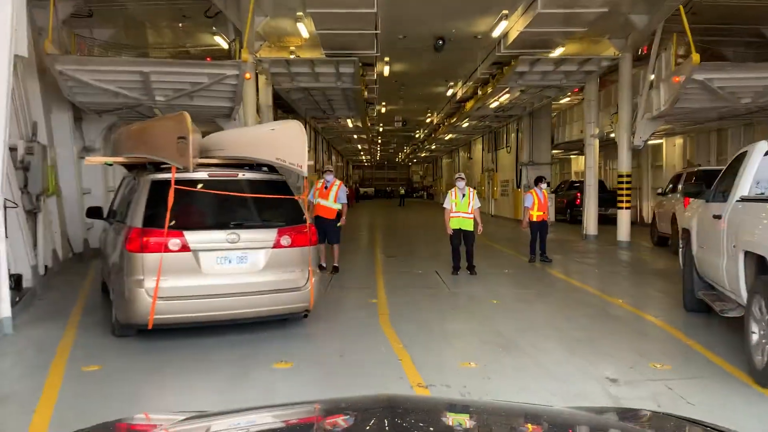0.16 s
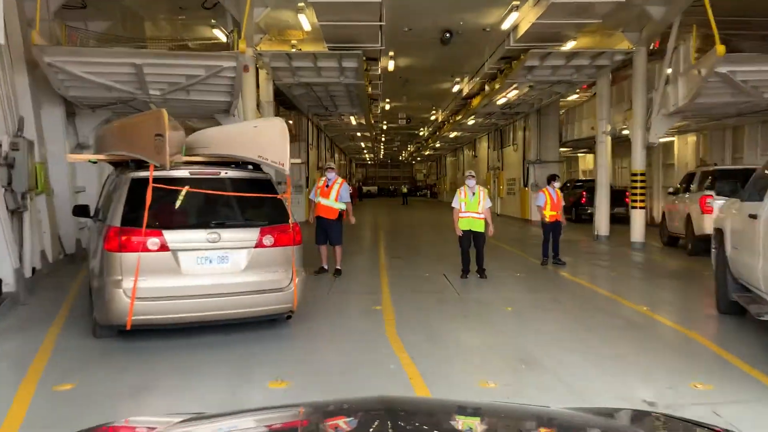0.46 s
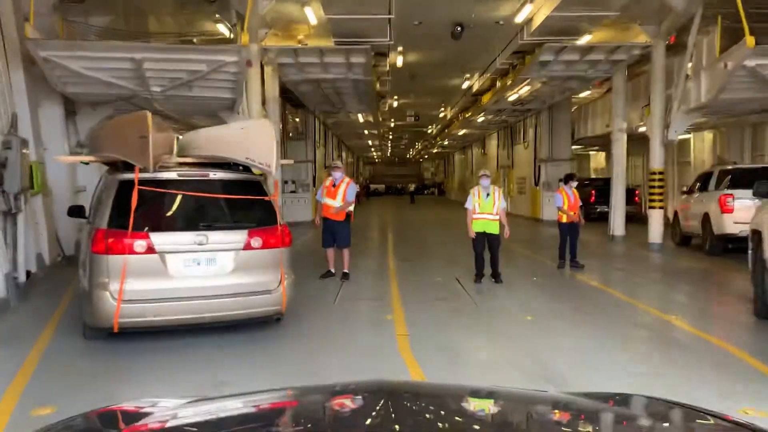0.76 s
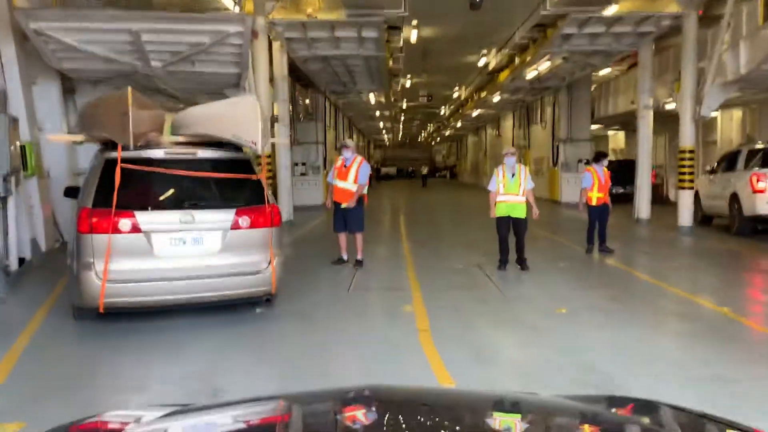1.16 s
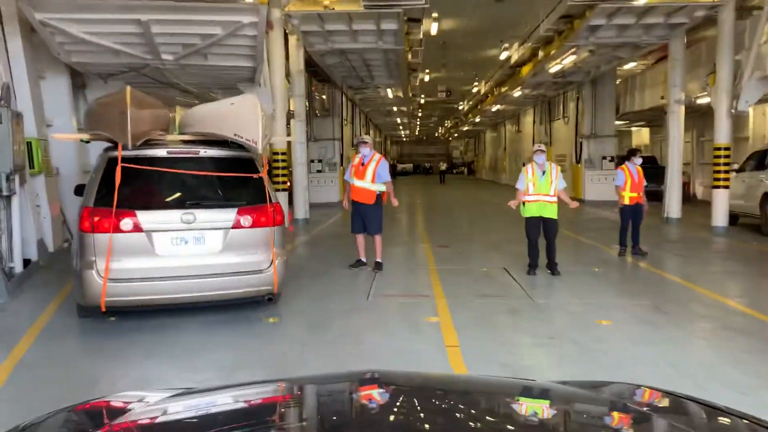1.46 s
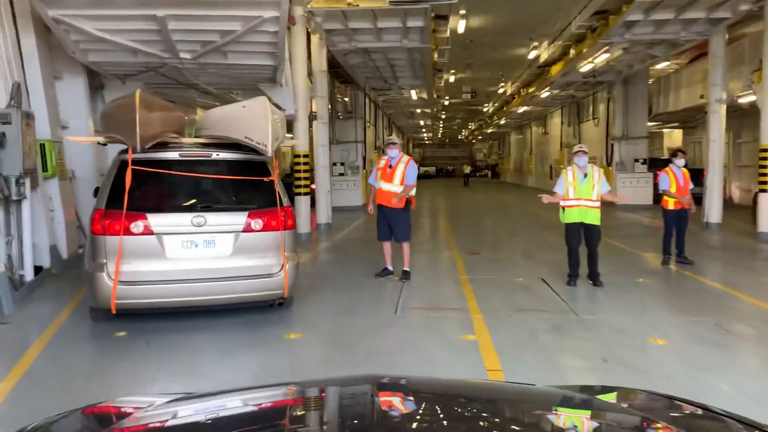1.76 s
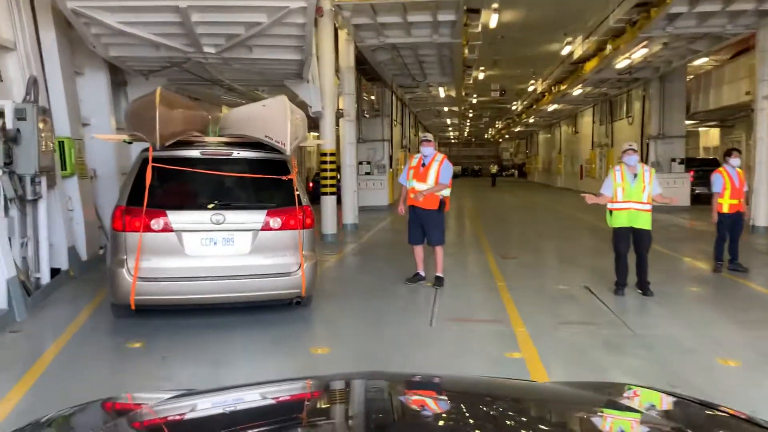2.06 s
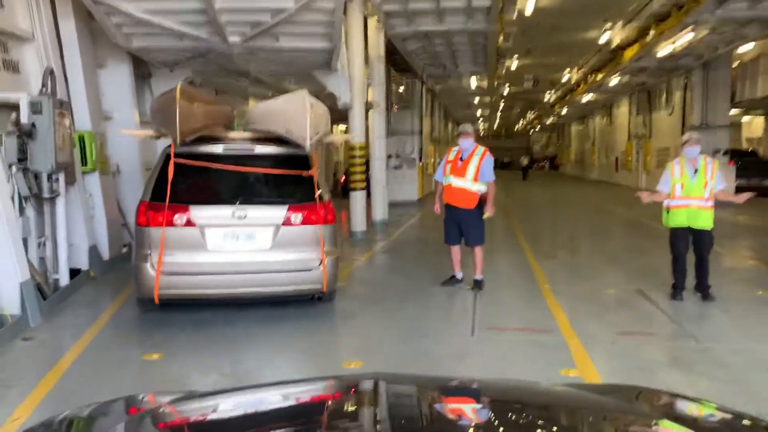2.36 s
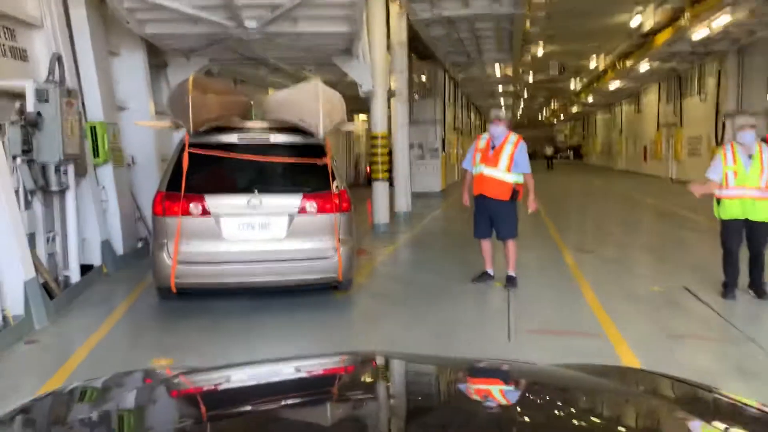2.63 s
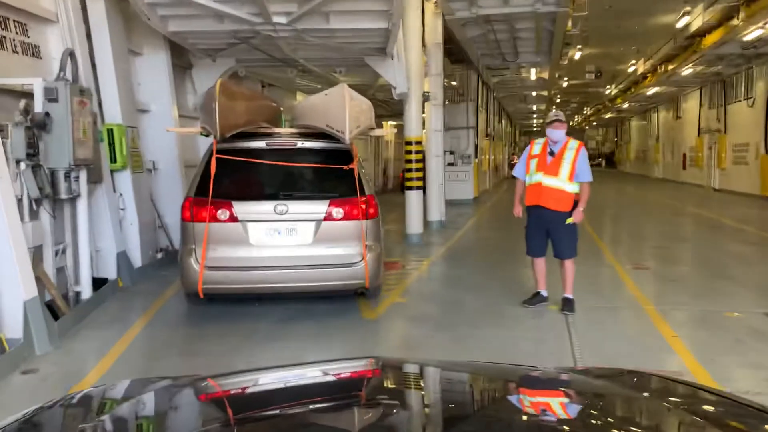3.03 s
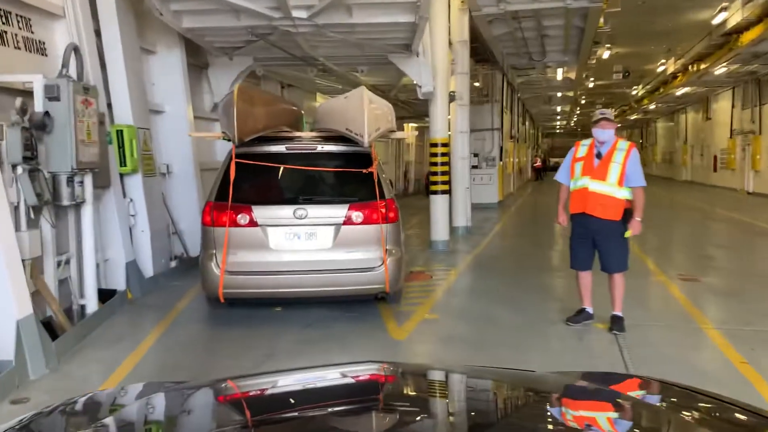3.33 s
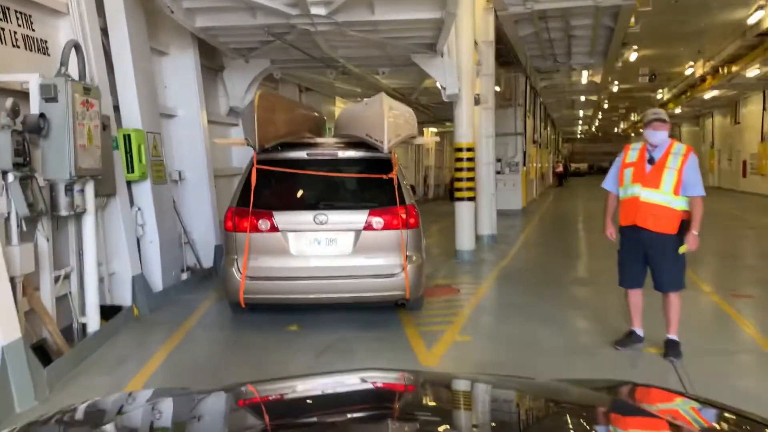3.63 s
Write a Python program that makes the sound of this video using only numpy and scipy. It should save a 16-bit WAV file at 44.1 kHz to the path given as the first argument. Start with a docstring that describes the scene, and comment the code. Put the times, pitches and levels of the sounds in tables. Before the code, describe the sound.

A car rolls slowly over a ferry's steel vehicle deck, its uneven low rumble and booming drone lasting all four seconds. Ventilation roars steadily, with a wavering low hum and a second wandering tone. A tiny bright air spit comes at 0.9 s. Distant ramp plates clatter with scrape and thud at 1.2 s, softer and duller at 2.2 s, and longer, scrapier at 3.0 s, echoing through the hall.

```python
"""On the steel vehicle deck of a ferry, a car creeps along with its window open.
The ship's fans roar (shaped noise) and hum (a tone with overtones, beside a second tone that wanders).
The deck drones under the tyres: noise through low resonances. Far back, ramp plates clatter as wheels
cross them: a scrape, many small knocks, ringing steel and a thud, with the echo of the long hall.
Once, a valve spits air: a very short burst of bright noise."""
import sys
import numpy as np
from scipy import signal
from scipy.fft import rfft, irfft, next_fast_len
from scipy.io import wavfile
from scipy.ndimage import uniform_filter1d, map_coordinates

SR = 44100
rng = np.random.default_rng(int(sys.argv[2]) if len(sys.argv) > 2 else 0)


def to_wav(sig):
    """Store sig (one row per channel, or 1-D mono) as 16-bit WAV at the path in sys.argv[1].

    Samples outside -1..1 are clipped; the rate is SR.
    """
    pcm = np.clip(np.atleast_2d(sig), -1, 1) * 32767
    pcm = np.round(pcm).astype(np.int16)
    wavfile.write(sys.argv[1], SR, pcm.T)  # frames by channels


N = 167139


def amp(db):
    """Turn decibels into a plain loudness factor."""
    return 10 ** (np.asarray(db) / 20)


def unit(x):
    """Scale a sound to an average strength (rms) of 1."""
    return x / np.sqrt(np.mean(x ** 2) + 1e-20)


def along(points, hz):
    """Read a curve of (frequency, value) points on a log frequency axis."""
    f, v = np.transpose(points)
    return np.interp(np.log(hz + 1), np.log(f + 1), v)


def colour(points):
    """Make a filter from (frequency [Hz], level [dB]) points."""
    return lambda hz: amp(along(points, hz))


def curves(rows):
    """Give one value per sample for each column after the time."""
    times, *columns = np.transpose(rows)
    return [np.interp(np.arange(N) / SR, times, column) for column in columns]


def wobble(rate):
    """Draw a smooth random curve with `rate` random points a second."""
    points = rng.standard_normal(int(N * rate / SR) + 4)
    return map_coordinates(points, [np.arange(N) * rate / SR])


def filtered(x, response):
    """Multiply the spectrum of x by a response that depends on frequency."""
    m = next_fast_len(N + SR // 2)
    return irfft(rfft(x, m) * response(np.fft.rfftfreq(m, 1 / SR)), m)[..., :N]


def peak(f, hz, width):
    """Response of one resonance, which rings on after it is struck."""
    return 1j * f * width / (hz * hz - f * f + 1j * f * width)


def patchy(x, patch_db):
    """Give x patches of random loudness, spread over time and frequency."""
    z = signal.stft(x, nperseg=1024)[2]
    field = rng.standard_normal(z.shape[1:])
    field = uniform_filter1d(uniform_filter1d(field, 3, 0), 6, 1)
    return signal.istft(z * amp(patch_db * unit(field)), nperseg=1024)[1][:, :N]


# How alike left and right are: (frequency [Hz], likeness [1 = same, 0 = unrelated, below 0 = opposed])
LIKENESS = [(60, 1), (130, 0.92), (290, 0.84), (640, 0.43), (1410, -0.27), (3100, 0.86), (6810, 0.023),
            (15000, 0.1)]


def rush(gain, likeness=LIKENESS, left_leads_s=0, patch_db=0):
    """Stereo noise of rms 1, made of a shared middle part and a part opposed in the two ears."""
    pair = patchy(rng.standard_normal((2, N)), patch_db)

    def middle_and_side(hz):
        angle = np.arccos(np.clip(along(likeness, hz), -1, 1)) / 2
        return gain(hz) * [np.cos(angle), np.sin(angle)]

    mid, side = filtered(pair, middle_and_side)
    right = np.roll(mid - side, round(left_leads_s * SR))
    return unit(np.array([mid + side, right]))


# How long the hall's echo lasts: (frequency [Hz], time to fade by 60 dB [s])
HALL_FADE = [(300, 0.66), (2000, 0.69), (6000, 0.73), (14000, 0.41)]


def hall(x, wet_db):
    """Add the hall's echo, noise in which each frequency dies at its own speed."""
    hz, t, z = signal.stft(rng.standard_normal((2, SR)), SR, nperseg=256)
    fade = amp(-60 * t / along(HALL_FADE, hz)[:, None])
    tail = signal.istft(z * fade, SR, nperseg=256)[1]
    tail = tail / np.linalg.norm(tail[0])
    return x + amp(wet_db) * signal.fftconvolve(x, tail, axes=1)[:, :N]


# Loudness of the roar: (time [s], middle before MIDDLE_LIFT_DB [dB], treble [dB])
ROAR_LEVELS = [(0.0, -21.5, -31.5), (0.5, -22.5, -31), (0.85, -22.5, -30), (1.46, -20, -29.5),
               (1.68, -23.5, -31.5), (1.9, -24.5, -33), (3.11, -23, -30), (3.26, -21.5, -28),
               (3.53, -22.5, -29.5), (3.79, -24.5, -30.5)]
# Colour of the roar's middle: (frequency [Hz], relative level per Hz [dB])
MIDDLE_COLOUR = [(53, -52), (90, -9), (150, -1), (257, 2.5), (301, -4), (486, -5.5), (544, -6), (650, -8),
                 (727, -8.5), (822, -8), (1300, -16), (1690, -76), (2860, -120)]
# Colour of the roar's treble: (frequency [Hz], relative level per Hz [dB])
TREBLE_COLOUR = [(650, -12), (1100, -13.5), (1370, -1), (2550, -6.5), (3700, -11), (4800, -15.5),
                 (5200, -18), (6200, -21.5), (7300, -24), (8300, -24.5), (9600, -26.5), (11700, -34.5),
                 (13100, -26.5), (14000, -37), (14600, -41), (15500, -41)]
# Steady narrow strips of noise: (frequency [Hz], width of one resonance pass [Hz], level [dB rms])
NARROW_BANDS = [(30, 15, -42), (146.74, 6.2, -27.5), (491.2, 28, -36.5), (6570, 330, -48.5)]
MIDDLE_LIFT_DB = 3.5
TREBLE_LIKENESS, TREBLE_LEFT_LEADS_S = 0.17, .00046
PATCH_DB = 1.5  # strength of the uneven patches in the treble and in the scrapes


def ventilation():
    """Moving air and machinery make a broad roar of noise, with a few narrow strips standing out."""
    middle_db, treble_db = curves(ROAR_LEVELS)
    middle = amp(middle_db + MIDDLE_LIFT_DB) * rush(colour(MIDDLE_COLOUR))
    treble_level = amp(treble_db + 0.27 * wobble(11))
    treble = treble_level * rush(colour(TREBLE_COLOUR), [(1000, TREBLE_LIKENESS)],
                                 TREBLE_LEFT_LEADS_S, PATCH_DB)
    narrow = sum(amp(db) * rush(lambda f: peak(f, hz, width) ** 2) for hz, width, db in NARROW_BANDS)
    return middle + treble + narrow


# Loudness of the fan: (time [s], blade tone [dB], overtones as a group, before their own levels [dB])
FAN_LEVELS = [(0.0, -23, -26), (0.04, -18.5, -55), (0.17, -18.5, -40), (0.25, -18.5, -29.5),
              (0.47, -16.5, -38.5), (0.54, -16, -29.5), (1.15, -24, -38), (1.72, -24.5, -34.5),
              (1.94, -29.5, -45), (2.33, -21.5, -34.5), (2.44, -21.5, -52), (2.72, -29, -32.5),
              (2.94, -33, -42), (3.04, -26, -38), (3.65, -19.5, -36.5), (3.79, -24, -56)]
# The fan's overtones: (multiple of the blade tone, relative level [dB])
FAN_OVERTONES = [(2, -8), (3, -5), (4, 0), (5, -5), (6, -9)]
# The second, unsteady tone: (time [s], pitch before its wander [Hz], level [dB])
DRONE_PATH = [(0.0, 245, -27), (0.02, 254, -18), (0.08, 255.5, -23), (0.34, 257.0, -16.5),
              (0.64, 250, -26.5), (0.78, 251.6, -16.5), (0.81, 251, -37), (0.92, 250.3, -19.5),
              (0.96, 250.6, -39), (0.98, 247, -19), (1.01, 250.4, -36), (1.07, 252.8, -22),
              (1.16, 258, -33), (1.17, 256.7, -18), (1.51, 258.4, -31), (1.61, 254.8, -17.5),
              (1.7, 254.9, -28), (1.76, 254.4, -19.5), (1.9, 256.8, -30), (2.38, 253.9, -28),
              (2.51, 248, -36.5), (2.59, 252.5, -17), (2.71, 253.5, -36), (2.83, 251, -22.5),
              (3.05, 248.7, -36.5), (3.11, 252, -22.5), (3.36, 258.3, -17.5), (3.38, 259.2, -31.5),
              (3.68, 253.5, -19), (3.79, 263, -27)]
FAN_HZ, DRONE_WIDTH_HZ = 165.5, 2.98
FAN_WAVER_DB, OVERTONE_WAVER_DB = 0.5, 2.5
FAN_WAVER_RAD = 0.06  # phase waver of the blade tone; it grows for the overtones


def hum():
    """The blade tone and its overtones waver as their echoes mix; a second tone wanders in pitch."""
    tone_db, overtones_db = curves(FAN_LEVELS)
    drone_hz, drone_db = curves(DRONE_PATH)
    turn = 2 * np.pi * FAN_HZ * np.arange(N) / SR

    def partial(k, waver_db, rate):
        level = amp(waver_db * wobble(rate))
        return level * np.sin(k * turn + np.sqrt(k) * FAN_WAVER_RAD * wobble(13))

    overtones = sum(amp(db) * partial(k, OVERTONE_WAVER_DB, 3.87) for k, db in FAN_OVERTONES)
    wandering_hz = drone_hz + DRONE_WIDTH_HZ / 2 * wobble(8)
    drone = np.sin(2 * np.pi * np.cumsum(wandering_hz) / SR)
    blade = amp(tone_db) * partial(1, FAN_WAVER_DB, 9.0)
    # the root of 2 makes a plain sine's level count as rms
    return np.sqrt(2) * (blade + amp(overtones_db) * overtones + amp(drone_db) * drone)


STEADINESS = .6  # how strongly the chance swells of the narrow noise are evened out (0 = not at all)


def steadied(x):
    """Partly even out the chance swells of narrow noise."""
    swell = np.abs(signal.hilbert(x.mean(axis=0), next_fast_len(N))[:N])
    return unit(x / (swell + 0.17) ** STEADINESS)


# Loudness of the drone: (time [s], lowest group [dB], middle group [dB], upper group [dB])
RUMBLE_LEVELS = [(0.0, -21.5, -23, -28), (0.14, -32, -40, -32), (0.28, -28, -25, -30),
                 (0.34, -21, -26, -35), (0.44, -26, -28, -27), (0.52, -26, -18, -33),
                 (0.75, -25.5, -30, -30), (0.79, -27, -23, -34), (0.9, -21, -34, -27),
                 (0.93, -28, -41, -39), (0.98, -25, -23, -29), (1.08, -16, -30, -31), (1.11, -22, -21, -40),
                 (1.16, -28, -23, -17), (1.22, -20, -33, -39), (1.27, -22, -22, -28), (1.33, -33, -29, -34),
                 (1.38, -23, -24, -14.5), (1.43, -28, -23, -30), (1.77, -31, -34, -34),
                 (1.81, -31, -40, -42), (1.88, -18, -31, -46), (2.02, -26, -33, -23),
                 (2.07, -33.5, -27, -28), (2.15, -18, -34, -24), (2.23, -28, -28, -36),
                 (2.34, -28, -27, -19), (2.42, -33, -30, -34), (2.57, -20.5, -33, -23.5),
                 (2.76, -23.5, -34, -45), (2.8, -29, -38, -26), (2.95, -22, -38, -30),
                 (3.03, -28, -30, -26), (3.1, -27, -32.5, -27), (3.63, -29, -28, -31),
                 (3.79, -27, -34, -24)]
# The deck's low resonances, one list per group: (frequency [Hz], width [Hz], relative level [dB])
DECK_GROUPS = [
    [(28.2, 5.4, -13), (47.2, 12, -5), (66.3, 8.5, 4.5)],
    [(87.2, 13.3, 0)],
    [(115.6, 32, 0)],
]
# Loudness of a higher boom: (time [s], level [dB])
BOOM_LEVELS = [(0.0, -35), (0.05, -26), (0.77, -31.5), (0.79, -39), (0.85, -28), (1.0, -34), (1.05, -27.5),
               (1.24, -35), (1.29, -18.5), (1.36, -27), (2.03, -33.5), (2.05, -46), (2.25, -22),
               (2.27, -30), (2.5, -36.5), (2.54, -18), (2.59, -35.5), (2.88, -25.5), (3.09, -34),
               (3.23, -23), (3.3, -28), (3.79, -30.5)]
BOOM_HZ, BOOM_WIDTH_HZ = 388.5, 53


def rolling():
    """Tyres and engine shake the deck, so noise rings its low resonances."""
    def deck(modes):
        return steadied(rush(lambda f: sum(amp(db) * peak(f, hz, width) ** 2 for hz, width, db in modes)))

    boom = amp(curves(BOOM_LEVELS)[0]) * deck([(BOOM_HZ, BOOM_WIDTH_HZ, 0)])
    groups = zip(curves(RUMBLE_LEVELS), DECK_GROUPS)
    return boom + sum(amp(level_db) * deck(modes) for level_db, modes in groups)


# The wheel crossings, levels before swells and echo: (time [s], length before the fall [s],
# delay of the rattle [s], scrape [dB], rattle [dB], ring [dB], thud [dB])
CROSSINGS = [(1.239, 0.12, .015, -32, -25, -27, -25), (2.205, 0.071, 0.0041, -48.5, -37.5, -34, -27.5),
             (3.049, 0.16, 0.025, -32.5, -31, -49, -30.5)]
# Resonances of the ramp plate: (frequency [Hz], width [Hz], relative level [dB])
PLATE_MODES = [(661, 92.7, 3), (896, 90, 9), (1006, 55.4, 9), (1423, 38, 11), (1500, 66, -7),
               (1784, 45, -4), (2380, 450, -30), (3010, 66, -15), (3520, 90, -17), (4080, 120, -13)]
# Colour of the rattle, one list per crossing: (frequency [Hz], relative level per Hz [dB])
RATTLE_COLOURS = [
    [(700, -43), (1200, -6.5), (1900, -4), (3000, -11.5), (4500, -10.5), (6000, -34), (7800, -49),
     (13000, -120)],
    [(700, -40), (1200, -19), (1700, 1), (3000, -7), (6000, -26), (7800, -52), (13000, -120)],
    [(700, -29), (1200, -3.5), (1880, 3.5), (2800, -6), (3650, -1), (5000, -13), (6000, -24), (7800, -47),
     (13000, -120)],
]
# Colour of the scrape, one list per crossing: (frequency [Hz], relative level per Hz [dB])
SCRAPE_COLOURS = [
    [(2650, -9), (4500, -8.5), (5890, -6), (7500, -16), (9200, -21), (10300, -19), (11700, -34),
     (13000, -26), (13800, -42), (15500, -50)],
    [(2650, -18), (4500, -5), (10000, -17), (11500, -50), (15500, -80)],
    [(2650, -2.5), (4500, -1.5), (5600, -8), (7200, -14), (8180, -8), (9000, -14), (9700, -17),
     (11700, -30), (13000, -40), (15500, -50)],
]
# Colour of the thud: (frequency [Hz], relative level per Hz [dB])
THUD_COLOUR = [(190, -39), (320, -2), (611, 2.5), (649, -9), (903, 8), (1240, -10.5), (1600, -9.5),
               (2080, -41), (3520, -120)]
SCRAPE_RISE_S, RISE_S, FALL_S = 0.022, 0.037, 0.03  # FALL_S: time to drop to about a third
KNOCKS_PER_S, KNOCK_SPREAD_DB = 3300, 4
UNEVEN_DB, CLUMP_DB = 1.2, 1.5  # strength of the swells and of the clumps
CLATTER_WET_DB = 3.5


def ramp():
    """Each wheel crossing: a bright scrape, then dense knocks that partly ring in the plate, and a thud."""
    t, out = np.arange(N) / SR, np.zeros((2, N))

    def plate(f):
        # neighbouring resonances swing in opposite directions
        return sum((-1) ** k * amp(db) * peak(f, hz, width) for k, (hz, width, db) in enumerate(PLATE_MODES))

    for crossing, rattle_colour, scrape_colour in zip(CROSSINGS, RATTLE_COLOURS, SCRAPE_COLOURS):
        start, length, delay, scrape_db, rattle_db, ring_db, thud_db = crossing
        fall = np.exp(-np.clip(t - start - length, 0, None) / FALL_S) * amp(UNEVEN_DB * wobble(39.67))
        early = np.clip((t - start) / SCRAPE_RISE_S, 0, 1) * fall
        late = np.clip((t - start - delay) / RISE_S, 0, 1) * fall

        hits = rng.random((2, N)) < KNOCKS_PER_S / SR
        knocks = hits * amp(KNOCK_SPREAD_DB * rng.standard_normal((2, N)))
        knocks = unit(knocks * np.sign(rng.standard_normal((2, N))))
        rattle = late * unit(filtered(knocks, colour(rattle_colour)))
        ring = filtered(knocks * late, plate) / np.std(filtered(knocks, plate))
        scrape = early * rush(colour(scrape_colour), patch_db=PATCH_DB)
        thud = late * rush(colour(THUD_COLOUR))

        clatter = amp(scrape_db) * scrape + amp(rattle_db) * rattle
        clatter = clatter + amp(ring_db) * ring + amp(thud_db) * thud
        out += patchy(hall(clatter, CLATTER_WET_DB), CLUMP_DB)
    return out


# Colour of the air burst: (frequency [Hz], relative level per Hz [dB])
SPIT_COLOUR = [(3820, -29), (6500, -4), (9000, -6), (10300, 4), (11700, -10), (12400, -5), (13100, 4),
               (13800, 5), (14500, -9), (15500, -13)]
SPIT_S, SPIT_RISE_S, SPIT_T60_S = .93, 0.0032, 0.051  # start, rise, time to fade by 60 dB
SPIT_DB, SPIT_WET_DB = -24, -0.5


def valve():
    """Escaping air hisses once: bright noise that starts fast and dies at once, with the hall's echo."""
    t = np.arange(N) / SR - SPIT_S
    shape = np.clip(t / SPIT_RISE_S, 0, 1) * amp(SPIT_DB - 60 * np.abs(t) / SPIT_T60_S)
    return hall(shape * rush(colour(SPIT_COLOUR)), SPIT_WET_DB)


def scene():
    """Add up all the sources."""
    return ventilation() + hum() + rolling() + ramp() + valve()


# What the left port shares with the right: (frequency [Hz], share of the right's sound [0 to 1])
PORT_SHARE = [(4500, 0), (6500, .35), (8500, .65), (10000, .9), (15500, .97)]
# Balance of the two sides: (frequency [Hz], left over right [dB])
SIDE_BALANCE = [(60, -1.5), (110, -1), (200, .5), (380, .3), (700, 1), (1290, 1), (2380, .6), (4400, .5),
                (8120, -1.5), (12000, 0)]
RIGHT_LEADS_S, IN_STEP_HZ = .000308, 7000  # the shared sound is in step at IN_STEP_HZ
CEILING, KNEE = 1.1, 4  # limit for the peaks, and how sharply they bend towards it
TOP_HZ = 15590


def record(dry):
    """In the treble both ports hear nearly the same, the right first; peaks are rounded, the top cut."""
    def into_left(hz):
        share = np.clip(along(PORT_SHARE, hz), 0, 1)
        lag = np.exp(-2j * np.pi * RIGHT_LEADS_S * (hz - IN_STEP_HZ))
        return [np.sqrt(1 - share ** 2), share * lag]

    left = filtered(dry, into_left).sum(axis=0)
    # each side takes half of the balance
    x = filtered(np.array([left, dry[1]]), lambda hz: amp(along(SIDE_BALANCE, hz) * [[.5], [-.5]]))
    rounded = x / (1 + np.abs(x / CEILING) ** KNEE) ** (1 / KNEE)
    return filtered(rounded, lambda hz: hz < TOP_HZ)


dry = scene()
out = record(dry)
to_wav(out)
```